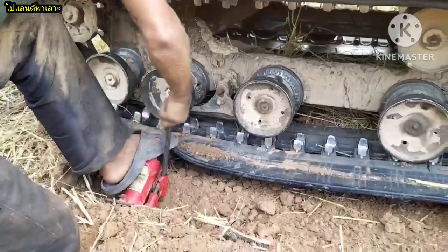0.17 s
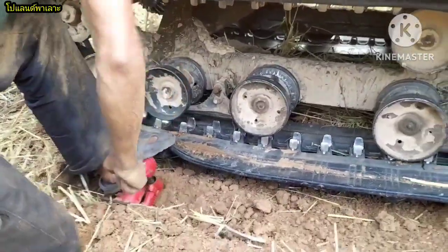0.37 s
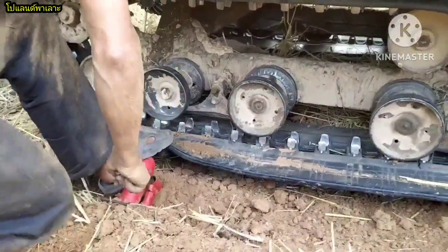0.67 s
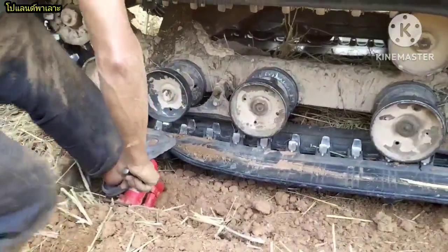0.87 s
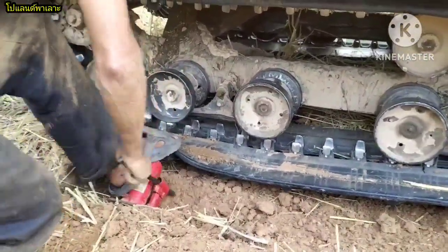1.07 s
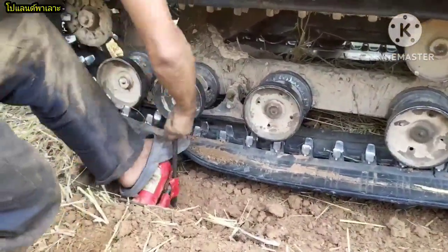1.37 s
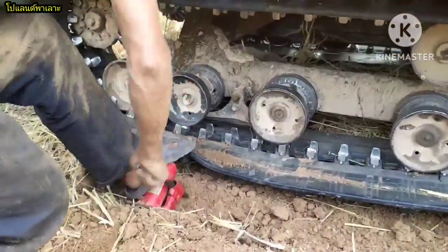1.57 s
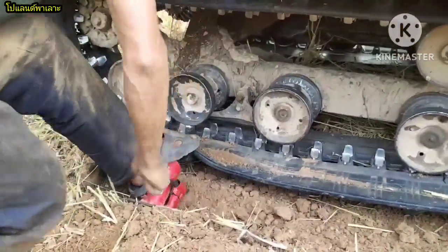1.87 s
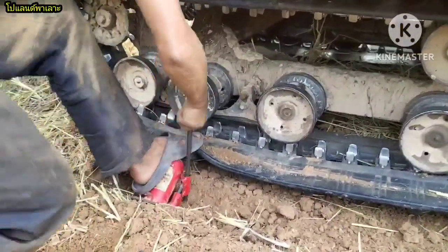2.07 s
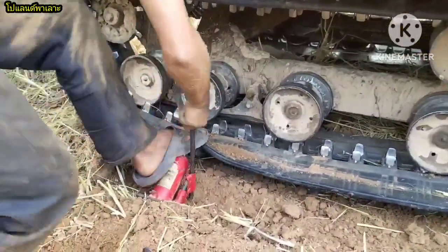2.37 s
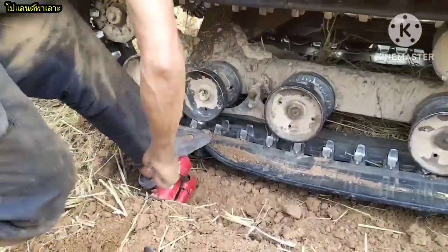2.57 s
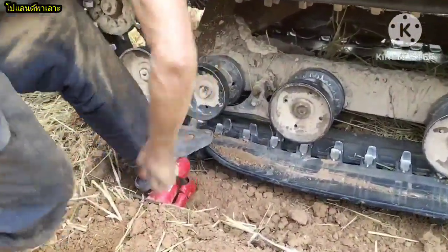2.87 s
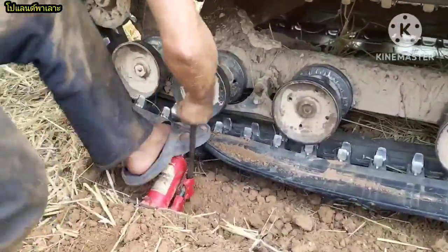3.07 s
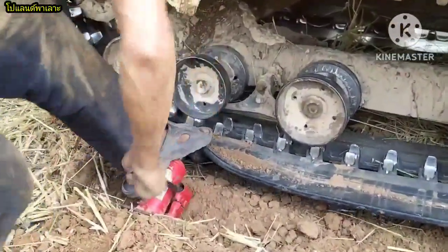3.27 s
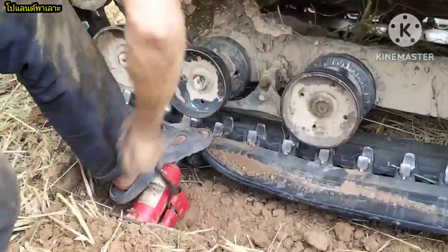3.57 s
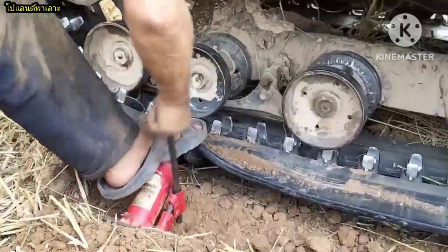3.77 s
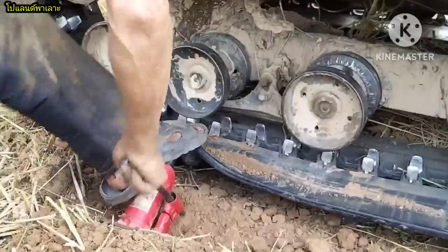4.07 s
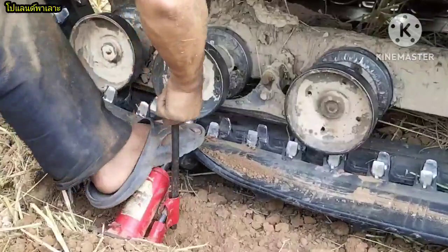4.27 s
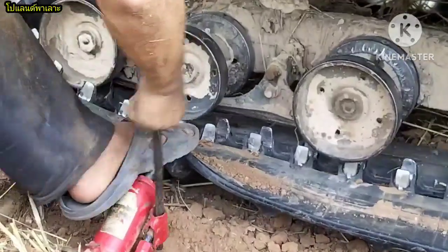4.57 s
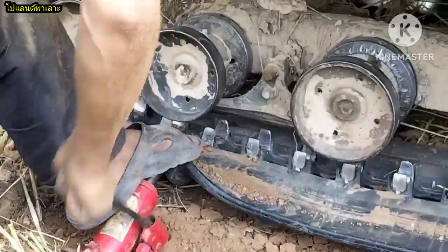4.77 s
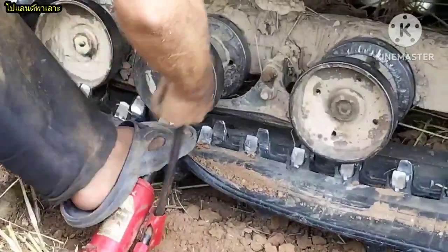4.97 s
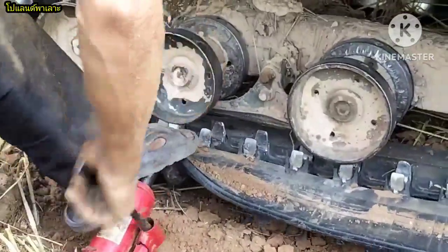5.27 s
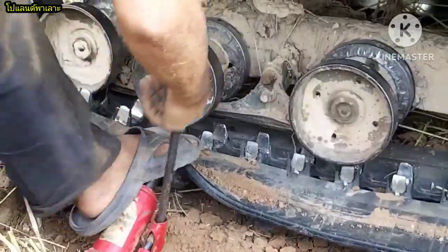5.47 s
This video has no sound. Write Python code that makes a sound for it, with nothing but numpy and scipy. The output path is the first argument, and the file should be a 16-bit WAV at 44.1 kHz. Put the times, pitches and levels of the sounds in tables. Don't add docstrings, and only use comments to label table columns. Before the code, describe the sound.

A hand-pumped jack clatters close by outdoors: quick metallic clicks, short ringing rod notes, knocks and snaps, with one brief early pause.

```python
import sys
import numpy as np
from scipy import signal
from scipy.fft import rfft, irfft, next_fast_len
from scipy.io import wavfile
from scipy.ndimage import uniform_filter1d

SR = 44100
rng = np.random.default_rng(int(sys.argv[2]) if len(sys.argv) > 2 else 0)


def unload_wav(signal):
    wavfile.write(
        sys.argv[1],
        SR,
        np.round(np.clip(np.atleast_2d(signal).T, -1, 1) * 32767).astype(np.int16),
    )


def gain_from_db(level_db):
    decades = np.asarray(level_db, float) / 20
    return 10 ** decades


N = 248283

# [t/s, contact/ms, clack level/dB, bright clack level/dB, rod ring level/dB]
LANDINGS = [(0.1343, 3.8, -21.5, -33.5, -24.5), (0.4967, 5.9, -19, -33, -51),
            (1.6255, 4.2, -15.5, -25, -20), (2.007, 5.1, -28.5, -41, -38), (2.3467, 5.2, -22, -30.5, -30),
            (2.6953, 4.8, -21, -28.5, -33), (3.0529, 6.9, -19, -28, -50), (3.4202, 6.5, -20.5, -29.5, -35),
            (3.7735, 5.9, -19.5, -26, -30.5), (4.1511, 5.9, -21.5, -29.5, -50),
            (4.5513, 5.6, -21.5, -29, -33), (4.9586, 6.5, -25, -41, -49), (5.3718, 3.8, -31, -41, -23.5)]
TOUCHES = [(.0473, 2.3, -38, -37, -37), (.407, 17, -33.5, -49, -48), (1.2327, 13, -48, -50, -44),
           (1.321, 4.7, -39, -32, -33.5), (2.0649, 8.7, -42, -37, -40), (2.4985, 21, -62, -62, -49),
           (3.0991, 13, -63, -58, -51.5), (3.4666, 11, -51, -67, -34), (3.4864, 12, -67, -73, -50),
           (4.1217, 19, -63, -73, -55), (4.3829, 9.7, -56, -48, -54), (4.5973, 12, -77, -62, -44),
           (5.2227, 9.3, -53, -46, -36.5), (5.2771, 9.8, -50, -79, -38), (5.3216, 7.6, -69, -74, -54)]
LOW_BLOWS = [(.053, 5.2, -30.5, -44, -56), (.3244, 3.1, -30, -28.5, -46), (.3806, 7.7, -43.5, -41, -47),
             (.4244, 3.3, -14.5, -23.5, -16.5), (1.2856, 9.4, -59, -44, -59),
             (1.3678, 3.9, -25, -24.5, -25.5), (1.5574, 10.6, -26, -28, -31),
             (1.5706, 3.6, -16.5, -21.5, -16), (1.8372, 15, -68, -71, -51), (1.9161, 4.05, -17, -24, -17.5),
             (2.1528, 18, -64, -52.5, -47.5), (2.268, 3.8, -18, -22, -20.5), (2.4676, 5, -30.5, -32, -24),
             (2.606, 4.05, -22, -20, -19.5), (2.8128, 4.7, -65, -25, -24), (2.9682, 6.1, -27, -31.5, -23.5),
             (3.262, 6.4, -42, -39, -43), (3.8637, 8, -41, -36, -41), (4.0716, 4.1, -32, -53, -29.5),
             (4.2741, 6.4, -34.5, -34, -30.5), (4.6275, 5.5, -50, -40, -60), (4.7741, 7.9, -45.5, -43, -45),
             (5.1333, 13.6, -41, -36.5, -29), (5.5666, 8.5, -48, -49, -51)]
SLAPS = [(1.0454, 5.3, -49, -54, -69), (1.1632, 3.5, -66, -48, -71), (1.7491, 6.7, -18.5, -12.5, -18),
         (1.874, 5.7, -39, -40.5, -51), (2.1954, 5.9, -35, -19.5, -35), (3.1801, 4.9, -38, -19.5, -25.5),
         (3.3193, 4.9, -41, -46, -47), (3.3327, 9.3, -26, -25.5, -28.5), (3.5259, 5.6, -31, -32.5, -30.5),
         (3.616, 4.3, -26.5, -18.5, -24), (3.6913, 5.3, -28, -23, -19.5), (3.8954, 16, -33.5, -29.5, -28),
         (3.9889, 5.2, -37.5, -21.5, -34.5), (4.4685, 12, -26.5, -37.5, -28), (4.4795, 5.2, -16, -25, -52),
         (4.6684, 13.6, -29.5, -30, -30), (4.869, 12.7, -28.5, -31.5, -31),
         (4.8858, 4.7, -23.5, -48, -32.5), (5.0466, 5, -52, -24, -22), (5.0606, 9.8, -24.5, -28, -25),
         (5.3006, 5.1, -40, -56, -49), (5.08, 66, -74, -70, -47), (5.4774, 8.3, -26.5, -27, -21.5)]
RIM_BLOWS = [(.2225, 10, -34, -36, -27), (.2455, 5.7, -20, -20, -16), (1.446, 16, -43, -40, -54),
             (2.088, 11, -40, -42, -38), (2.1076, 9.7, -26, -28.5, -31.5), (2.4513, 5.2, -25.5, -30, -20.5),
             (2.5314, 13.7, -35.5, -27, -24), (2.8854, 4.3, -35.5, -23, -25.5),
             (3.1594, 4.9, -35, -49, -27), (3.167, 4.6, -37, -35, -33), (3.5416, 7.8, -33, -23.5, -21),
             (4.0569, 9.6, -22.5, -28, -32), (4.2344, 16.1, -49.5, -55, -54),
             (4.2978, 7.4, -31.5, -30, -24.5), (5.069, 3.1, -28, -31, -18.5),
             (5.4558, 27, -37.5, -51, -27.5)]
SLIDES = [
    (.255, 48, -59, -58, -43.5),
    (1.24, 190, -73, -82, -68),
    (2.075, 90, -70, -76, -60),
    (2.74, 88, -70, -68, -59),
    (3.11, 130, -73, -62, -59),
]


def contacts():
    # (contacts, second mode dB, third mode dB)
    places = [(LANDINGS, 0, -25), (TOUCHES, 0, -32), (LOW_BLOWS, 0, -7.5),
              (SLAPS, -2.8, 0), (RIM_BLOWS, -13, 0), (SLIDES, 0, -8)]
    return [(s, ms, dull_db, bright_db, ring_db + second_db, ring_db + third_db)
            for rows, second_db, third_db in places
            for s, ms, dull_db, bright_db, ring_db in rows]


def contact_timing(contact_ms):
    hold_ms = max(contact_ms - 4, .5)
    rise_ms = 0.26 + 0.068 * min(hold_ms, 15)
    damp = np.clip(contact_ms / 5.76, .45, 1)
    ms = np.arange(max(2000, int((hold_ms + 45) * SR / 1000))) * 1000 / SR
    return ms, rise_ms, hold_ms, damp


# [f/Hz, level/dB]
CLACK = [(600, -23), (1300, -17.5), (2000, -12.5), (3000, -4), (4400, 3.5), (5600, -5.5), (6500, -13.5)]
# [f/Hz, level/dB]
BRIGHT = [(5400, -1), (6500, 0), (7300, -0.5), (8200, -15), (10000, -23), (13000, -20), (15300, -28)]


def clack():
    case_hz = np.geomspace(1500, 7800, 26) * (1 + .02 * rng.standard_normal(26))
    chatter = gain_from_db(2.73 * walk(900))
    dull, bright, dull_ring, bright_ring = np.zeros((4, N))
    for s, contact_ms, dull_db, bright_db, _, _ in contacts():
        ms, rise_ms, hold_ms, damp = contact_timing(contact_ms)
        front = 0.85 + 0.75 * np.exp(-ms / 3.2)
        dull_shape = gain_from_db(dull_db - 4.5) * front * stroke(ms, rise_ms, hold_ms, 34 * damp)
        bright_shape = gain_from_db(bright_db - 5.5) * front * stroke(ms, rise_ms, hold_ms, 32 * damp)
        size, detune, turn = rng.standard_normal((3, 26))
        cycles = np.outer(case_hz * (1 + .03 * detune), ms[:2000]) / 1000 + turn[:, None]
        casting = gain_from_db(5 * size) @ np.sin(2 * np.pi * cycles)
        add(dull, s, dull_shape)
        add(bright, s, bright_shape)
        add(dull_ring, s, gain_from_db(-22) * dull_shape[:2000] * casting)
        add(bright_ring, s, gain_from_db(-21.5) * bright_shape[:2000] * casting)
    dull_noise = gain_from_db(-7.0) * smear(dull, -13.5, -23) * rng.standard_normal(N)
    bright_noise = gain_from_db(-1.5) * smear(bright, -19.5, -19) * rng.standard_normal(N)
    dull = chatter * (dull_noise + dull_ring)
    bright = chatter * (bright_noise + bright_ring)
    return colour(dull, CLACK) + colour(bright, BRIGHT)


def smear(shape, before_db, after_db):
    before = signal.lfilter([.004], [1, -.996], shape[::-1])[::-1]
    after = signal.lfilter([.0015], [1, -.9985], shape)
    return shape + gain_from_db(before_db) * before + gain_from_db(after_db) * after


# [t60/ms, level/dB, share that follows the third mode/0-1]
ROD = [(60, -22, .3), (50, 0, 0), (48, 0, 1), (40, -23, .6), (55, -19, .6), (25, -26, .5), (25, -31, .6)]
ROD_HZ = [1875, 3630, 5915, 8616, 11788, 12950, 15270]
# [t/s, level/dB, mode number]
MIDDLE = [(.135, -38.5, 0), (.247, -45, 0), (2.106, -40, 0), (3.160, -45.5, 0), (3.618, -45, 0),
          (4.598, -54, 0), (5.133, -38, 0), (5.457, -40, 0), (.247, -42, 6), (1.368, -47, 4),
          (2.196, -42, 3), (4.275, -49, 3), (4.668, -36.5, 5), (5.047, -54, 4), (4.669, -38, 1)]


def rod(rub_db):
    modes = np.zeros((len(ROD), N), complex)
    for s, contact_ms, _, _, second_db, third_db in contacts():
        ms, rise_ms, hold_ms, damp = contact_timing(contact_ms)
        chance = rng.standard_normal((len(ROD), 2))
        for mode, hz, (t60_ms, db, share), (size, turn) in zip(modes, ROD_HZ, ROD, chance):
            level_db = db + second_db + share * (third_db - second_db)
            level_db += 3 * size * (db < -9)
            pitch = hz * (1 + .008 * size)
            shape = stroke(ms, rise_ms + 0.083, hold_ms, t60_ms * damp)
            add(mode, s, gain_from_db(level_db) * shape * np.exp(2j * np.pi * (pitch * ms / 1000 + turn)))
    ms = np.arange(4500) * 1000 / SR
    for s, db, k in MIDDLE:
        tone = np.exp(2j * np.pi * ROD_HZ[round(k)] * ms / 1000)
        add(modes[round(k)], s, gain_from_db(db) * stroke(ms, 0.64, 6.3, 38) * tone)
    out = np.zeros(N)
    for mode, hz, (_, db, share) in zip(modes, ROD_HZ, ROD):
        b, a = signal.iirpeak(hz, hz / 130, fs=SR)
        rub_level = gain_from_db(rub_db + 0.82 * db - 3.6 * share + 2.2 * walk(21.2))
        rub = rub_level * signal.lfilter(b, a, rng.standard_normal(N))
        out += gain_from_db(3.66 * walk(300)) * np.real(mode * np.exp(1.1j * walk(250))) + rub
    return out


# [t/s, length/ms, level/dB, mode number]
RINGS = [(1.233, 20, -48, 1), (1.27, 45, -58, 1), (1.325, 42, -44, 1), (1.378, 18, -48, 1),
         (1.52, 30, -52, 1), (1.8, 30, -57, 1), (1.84, 12, -50, 1), (.18, 40, -54, 0), (.185, 30, -54, 2),
         (2.12, 60, -48, 2), (3.83, 30, -48, 1)]


def loose_rod():
    ms = np.arange(4500) * 1000 / SR
    out = np.zeros(N)
    for s, length_ms, db, k in RINGS:
        tone = np.sin(2 * np.pi * ROD_HZ[round(k)] * ms / 1000)
        add(out, s, gain_from_db(db) * stroke(ms, 2.5, length_ms, 45) * tone)
    return out * gain_from_db(4.5 * walk(200))


# [t/s, level/dB, f/Hz]
LUGS = [(.2185, -36, 4200), (1.4608, -30, 6600), (2.696, -28, 4300), (3.864, -36, 7400), (5.223, -43, 7100),
        (5.301, -47, 5800), (5.372, -32, 1900), (.3806, -42, 4300), (.4968, -24, 4300), (1.287, -44, 6900),
        (1.322, -33, 7000), (1.368, -26, 3800), (1.626, -24, 4200), (1.7495, -20, 7200),
        (1.7495, -22, 3700), (2.065, -35, 7400), (4.628, -36, 7400)]


def lugs():
    ms = np.arange(4500) * 1000 / SR
    out = np.zeros(N)
    for s, db, hz in LUGS:
        add(out, s, gain_from_db(db) * stroke(ms, .4, 1.5, 26) * np.sin(2 * np.pi * hz * ms / 1000))
    return out


# [t/s, level/dB, f/Hz]
POPS = [
    (1.6728, -31.5, 790),
    (2.0273, -27, 790),
    (2.1232, -29, 855),
    (2.4368, -21.5, 770),
    (2.4498, -18.5, 750),
    (2.4579, -18, 846),
    (2.991, -15.5, 810),
    (3.523, -35.5, 836),
    (4.193, -17.5, 790),
    (4.2008, -21.5, 670),
]
# [t/s, level/dB, f/Hz, t60/ms]
KNOCKS = [(.135, -50, 290, 40), (.497, -45, 260, 40), (1.626, -45, 230, 45), (.9506, -50, 227, 18),
          (1.5488, -31, 760, 11), (1.873, -40, 1270, 27), (1.9115, -38.5, 770, 58),
          (2.0063, -26, 1190, 5.5), (2.976, -30, 800, 7.7), (3.262, -44.5, 810, 44), (3.318, -38, 740, 15),
          (3.774, -30, 825, 42), (4.18, -36, 744, 13), (5.372, -29.5, 570, 5.8)]
# [t/s, level/dB, f/Hz]
GROANS = [
    (0.839, -39.5, 936),
    (3.352, -48.5, 940),
    (3.425, -40, 895),
    (3.447, -39, 919),
    (3.54, -51, 880),
    (3.6, -39.5, 845),
    (3.6227, -45.5, 927),
    (3.79, -44.5, 934),
]


def blows():
    base = [(s + 0.00099, db - 12.5, 514, 67, 4) for s, _, db, _, _ in LANDINGS]
    pops = [(*row, 7.8, -21.5) for row in POPS]
    knocks = [(*row, -3.5) for row in KNOCKS]
    groans = [(*row, 105, -10) for row in GROANS]
    return base + pops + knocks + groans


def low_rings():
    ms = np.arange(3000) * 1000 / SR
    out, rattle, soil = np.zeros((3, N))
    for s, db, hz, t60_ms, rattle_db in blows():
        ring = stroke(ms, 0.3, 0.83, 0.86 * t60_ms) * np.cos(2 * np.pi * hz * ms / 1000)
        add(out, s, -gain_from_db(db + 1.0) * ring)
        add(out, s, gain_from_db(db + rattle_db + 9.5) * np.exp(-((ms - .1) / 0.063) ** 2))
        add(rattle, s, gain_from_db(db + rattle_db + 0.5) * stroke(ms, 1.0, 0.14, 6 + 16000 / hz ** 2 * 300))
        if 400 < hz < 600:
            add(out, s, gain_from_db(db - 4) * stroke(ms, 2.0, 5.0, 36) * np.sin(2 * np.pi * 522 * ms / 1000))
        add(soil, s, gain_from_db(db - 11 - (hz - 500) / 17) * stroke(ms, 0.76, 3.1, 80))
    return out, rattle, soil


# [t/s, level/dB, f/Hz, body level/dB]
SNAPS = [
    (1.4605, -16, 740, -22),
    (2.5716, -11, 780, -15),
    (.9512, -38, 1500, 0),
    (1.0458, -40, 2500, -20),
    (1.337, -42, 950, -20),
    (.919, -44, 1500, -20),
    (.8485, -35, 2300, -30),
    (.854, -35, 2000, -30),
]


def valve_snaps():
    ms = np.arange(3000) * 1000 / SR
    out, rattle = np.zeros((2, N))
    for s, db, hz, body_db in SNAPS:
        swing = -np.sin(2 * np.pi * hz * ms / 1000) * gain_from_db(-60 * ms * hz / 1000 / 7)
        body = gain_from_db(body_db) * stroke(ms, .4, .6, 24) * np.sin(2 * np.pi * 350 * ms / 1000)
        edge = gain_from_db(-3) * np.exp(-((ms - .2) / .07) ** 2)
        snap = 1.5 * swing + body - edge
        add(out, s, gain_from_db(db) * signal.lfilter(*signal.butter(1, 170, "high", fs=SR), snap))
        add(rattle, s - .004, gain_from_db(db - 23) * stroke(ms, 2.5, 5, 40))
    return out, rattle


def thuds():
    rings, ring_rattle, soil = low_rings()
    snaps, snap_rattle = valve_snaps()
    rattle = (ring_rattle + snap_rattle) * rng.standard_normal(N)
    rattle = colour(rattle, [(700, -2.5), (1300, 6), (2600, -5.5), (7000, -14.0)])
    soil = colour(soil * rng.standard_normal(N), [(80, -20.5), (180, 3.0), (520, -6), (1100, -8.5)])
    thin = signal.butter(1, 200, "high", fs=SR, output="sos")
    return signal.sosfilt(thin, rings + snaps) + rattle + soil


# [t/s, length/ms, start f/Hz, end f/Hz, level/dB]
SQUEAKS = [
    (4.112, 36, 1800, 1350, -54),
    (4.532, 17, 1750, 1600, -47),
    (4.940, 16, 1750, 1600, -49),
    (5.102, 8, 1100, 1550, -45),
    (5.31, 45, 1600, 1450, -51),
    (4.16, 60, 1500, 2200, -50),
]


def squeaks():
    out = np.zeros(N)
    for s, length_ms, start_hz, end_hz, db in SQUEAKS:
        hz = np.linspace(start_hz, end_hz, int(length_ms * SR / 1000))
        hz *= 1 + .06 * walk(700)[:len(hz)]
        add(out, s, gain_from_db(db) * np.sqrt(np.hanning(len(hz))) * np.sin(2 * np.pi * np.cumsum(hz) / SR))
    return out * gain_from_db(5 * walk(500))


def each_stroke(now, shift_s, width_s, per_db=0):
    return sum(gain_from_db(per_db * (row[2] + 19)) * np.exp(-((now - row[0] - shift_s) / width_s) ** 2)
               for row in LANDINGS)


# [t/s, rustle level/dB]
MOTION = [(0, -66.5), (.3, -64.5), (.5, -67.5), (.6, -84), (.7, -65.5), (.76, -49.5), (.81, -63.5),
          (.847, -38), (.875, -53), (1, -67.5), (1.08, -66), (1.131, -54), (1.17, -62), (1.35, -62),
          (1.8, -65), (3.4, -61.5), (4.4, -64.5), (5.63, -64.5)]


def movement(now):
    motion_db = np.interp(now, *np.transpose(MOTION))
    return motion_db, motion_db + 9.5 * each_stroke(now, -0.072, 0.016)


# [f/Hz, level/dB]
RUSTLE = [(500, -10.5), (1000, -1), (1700, -5), (2500, -3), (4100, 2), (5300, -7), (6900, -1), (8200, -16)]
# [f/Hz, level/dB]
HISS = [(8000, -10), (9600, -25), (11100, -9), (11900, -2), (12500, -8), (15200, -10), (15500, -40)]
# [f/Hz, level/dB]
AIR = [(250, 2), (800, -3), (2000, -15.5), (7000, -15), (8500, -29.5)]


def rustle_and_air(now, motion_db, rustle_db):
    breeze = gain_from_db(-71.5 - 15 * ((now - 3.4) / 2) ** 2)
    sleeve = uniform_filter1d(gain_from_db(motion_db - 13), int(0.098 * SR))
    grains = gain_from_db(1.46 * walk(600) + 3.1 * walk(24.89))
    rustle = gain_from_db(rustle_db + 2.5) * colour(grains * rng.standard_normal(N), RUSTLE)
    hiss = np.hypot(breeze, sleeve) * colour(grains * rng.standard_normal(N), HISS)
    air = gain_from_db(-65 + 1.0 * walk(2.52)) * colour(rng.standard_normal(N), AIR)
    return patchy(rustle + hiss + air, 3.4)


def patchy(x, spread_db):
    _, _, z = signal.stft(x, nperseg=512)
    field = uniform_filter1d(rng.standard_normal(z.shape), size=12, axis=0)
    field = uniform_filter1d(field, size=5, axis=1)
    return signal.istft(z * gain_from_db(spread_db * field / field.std()), nperseg=512)[1][:N]


# [t/s, level/dB]
GROUND = [(0, -6), (.3, -5), (.55, -1), (.67, 5), (.85, -2), (1.05, -5), (1.6, -8), (1.72, -1), (2.2, 0),
          (2.8, 2), (3.3, 0), (3.6, 3), (3.9, -1), (4.3, 1), (4.6, -3), (5.1, 2), (5.63, 6)]
# [f/Hz, level/dB]
RUMBLE = [(30, -19), (60, -0.5), (115, 3), (200, -0.5), (400, -21.5)]


def rumble(now):
    heave_db = 10.5 * each_stroke(now, 0.044, 0.073, 0.45)
    level_db = -66 + np.interp(now, *np.transpose(GROUND)) + heave_db
    return gain_from_db(level_db + 3.6 * walk(20)) * colour(rng.standard_normal(N), RUMBLE)


def colour(x, points):
    (low, low_db), (top, top_db) = points[0], points[-1]
    hz, db = np.transpose([(low / 1.4, low_db - 25), *points, (top * 1.2, top_db - 25)])
    grid = np.arange(1025) * SR / 2048 + 1
    gain = np.interp(np.log(grid), np.log(hz), db)
    cep = irfft(gain * np.log(10) / 20)
    cep[1:1024] *= 2
    cep[1025:] = 0
    h = irfft(np.exp(rfft(cep)))
    return signal.fftconvolve(x, h / np.sqrt(np.sum(h ** 2)))[:N]


def walk(rate):
    k = int(SR / rate)
    held = np.repeat(rng.standard_normal(N // k + 1), k)
    return 1.3 * uniform_filter1d(uniform_filter1d(held, k), k)[:N]


def add(out, s, burst):
    i = int(s * SR)
    out[i:i + len(burst)] += burst[:N - i]


def stroke(ms, rise_ms, hold_ms, t60_ms):
    return (1 - np.exp(-(ms / rise_ms) ** 2)) * gain_from_db(-60 * np.maximum(ms - hold_ms, 0) / t60_ms)


def scene():
    now = np.arange(N) / SR
    motion_db, rustle_db = movement(now)
    pumping = (now < .55) | (now > 1.2)
    rub_db = np.where(pumping, rustle_db + 4.5, -90)
    handle = clack() + rod(rub_db) + loose_rod() + lugs()
    pump = thuds() + squeaks()
    field = rustle_and_air(now, motion_db, rustle_db) + rumble(now)
    return (handle + pump + field)[None]


def roll_off(x):
    return signal.sosfilt(signal.butter(12, 16630, fs=SR, output="sos"), x)


def record(dry):
    x = signal.sosfilt(signal.butter(2, 42, "high", fs=SR, output="sos"), dry)
    x = signal.sosfilt(signal.ellip(8, .3, 70, 16200, fs=SR, output="sos"), x)
    size = next_fast_len(N)
    hz = np.arange(size // 2 + 1) * SR / size
    shelf = gain_from_db(np.interp(hz, [15400, 15550], [0, -17]))
    x = irfft(rfft(x, size) * shelf, size)[:, :N]
    return roll_off(x)


dry = scene()
out = record(dry)
unload_wav(out)
```